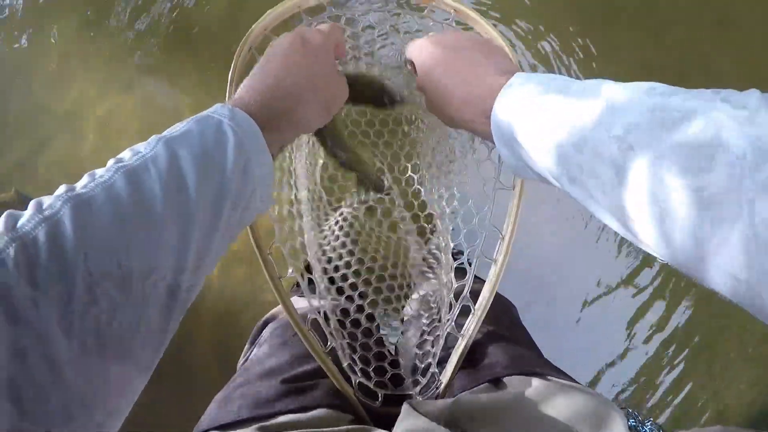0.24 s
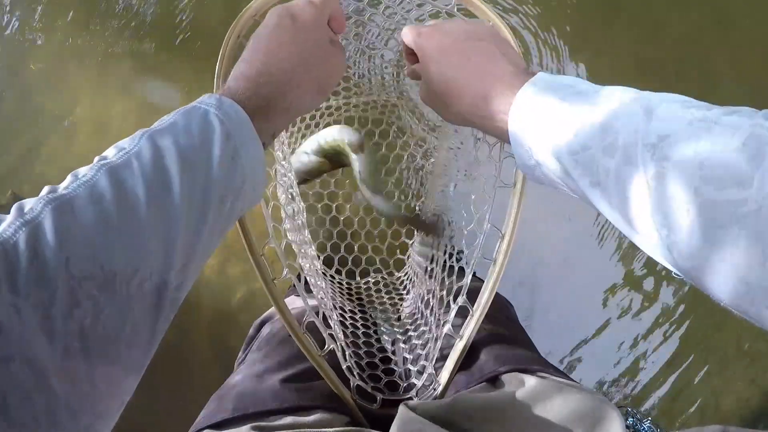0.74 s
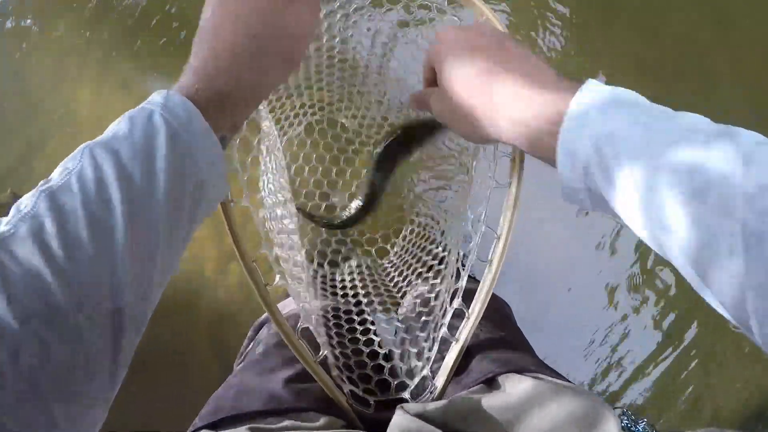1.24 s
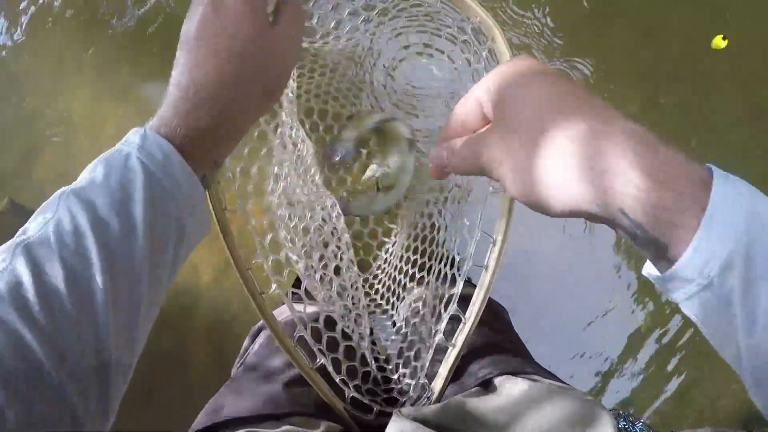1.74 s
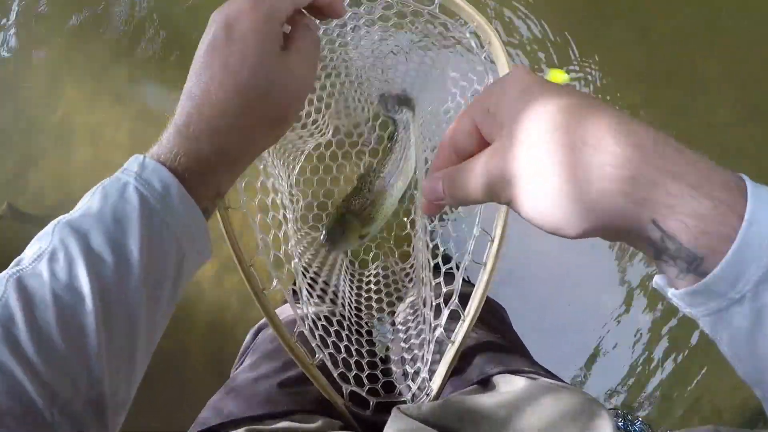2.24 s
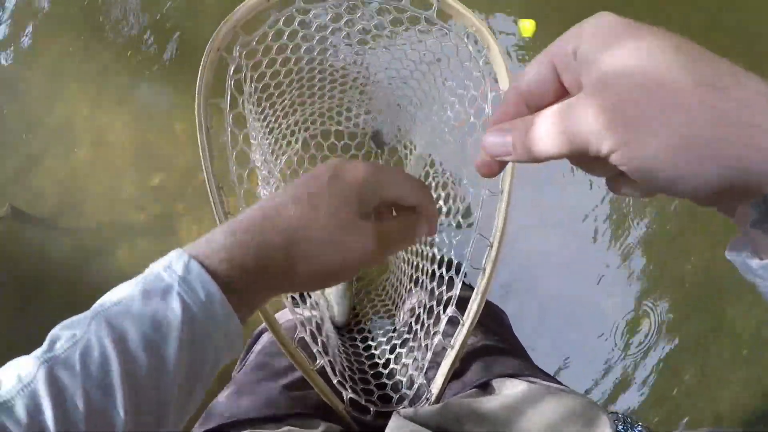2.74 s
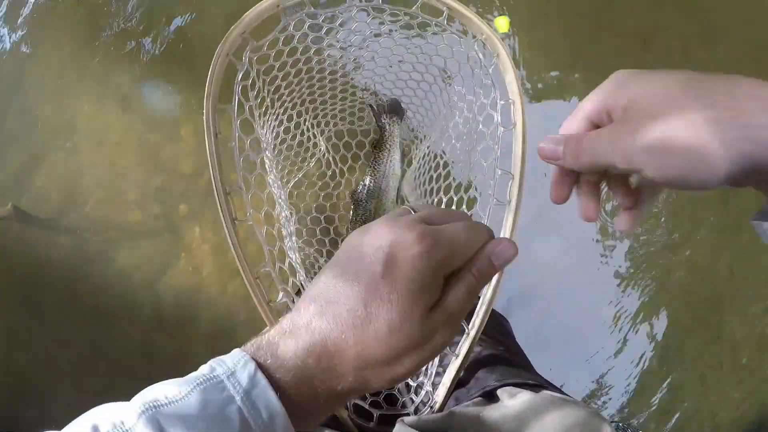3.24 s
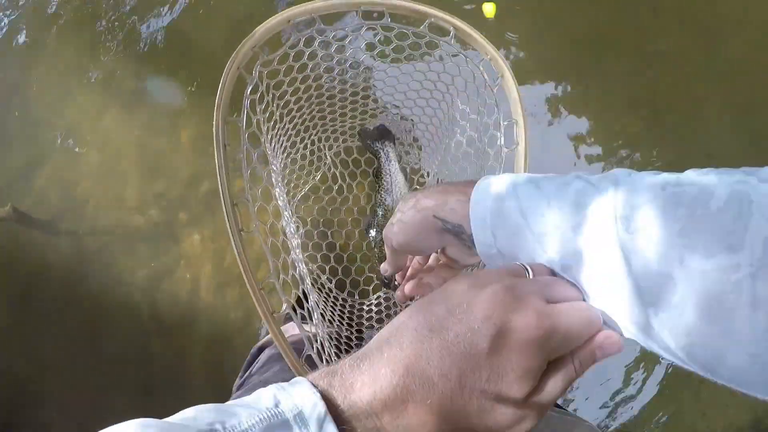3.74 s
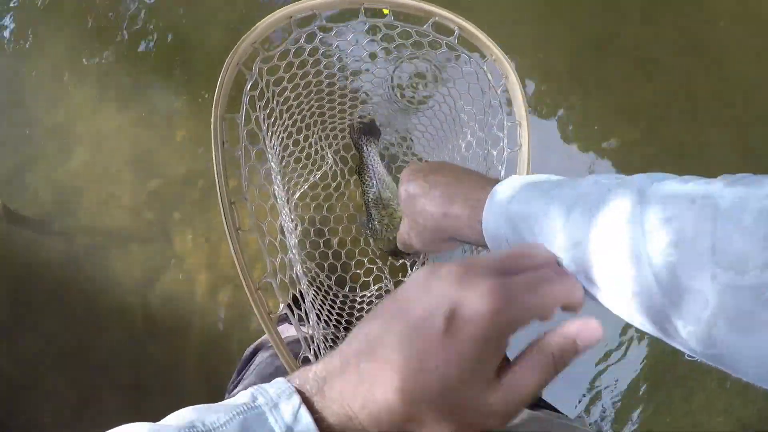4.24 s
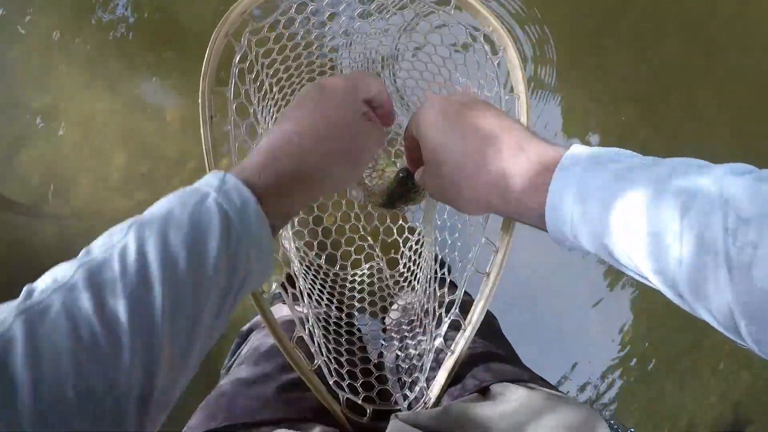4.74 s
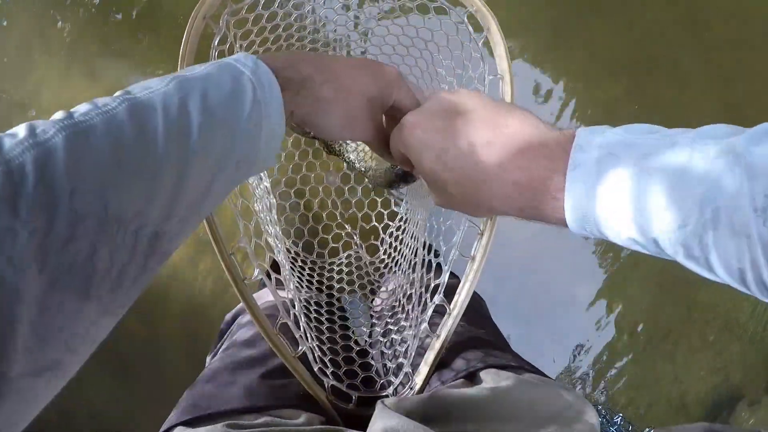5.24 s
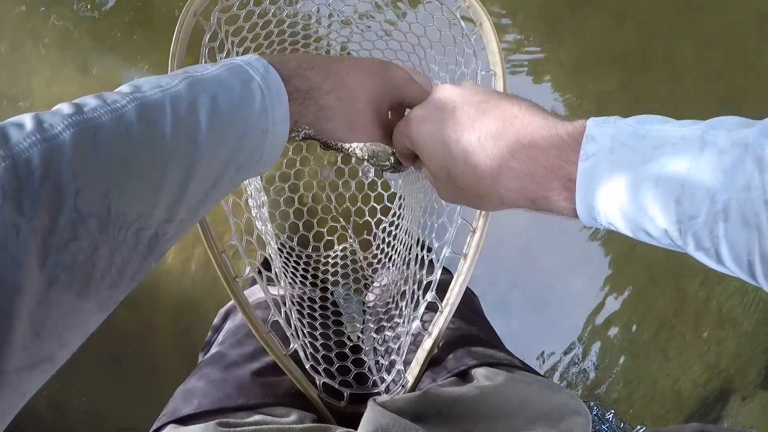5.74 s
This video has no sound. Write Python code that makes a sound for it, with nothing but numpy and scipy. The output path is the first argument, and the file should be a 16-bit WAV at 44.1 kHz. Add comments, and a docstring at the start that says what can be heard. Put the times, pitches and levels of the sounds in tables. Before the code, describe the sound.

Soft low thumps and gritty water flicks from a flapping fish, echoing birdsong over a faint creek, then a loud rumbling wind gust.

```python
"""A creek runs past an angler whose small camera looks down at a fish flapping in a wet landing net.
Filtered noise makes the creek and a fine treble hiss from the start, as short low tones and noise
bursts make the fish's thumps and flicks of water. Thin gliding sines whine high up, now and then.
From 2 s birds whistle in echoing woods, and from 3.2 s one sings a phrase four times, all as gliding sines.
Late on, low puffs and a gust of dull noise buffet the two microphone ports; a last drip falls at 5.1 s."""
import sys
import numpy as np
from scipy import signal
from scipy.fft import rfft, irfft
from scipy.io import wavfile
from scipy.ndimage import uniform_filter1d

SR = 44100
rng = np.random.default_rng(int(sys.argv[2]) if len(sys.argv) > 2 else 0)


def wav_record(signal):
    """Record a signal, one row per channel, as 16-bit PCM in the file named by sys.argv[1]."""
    frames = np.transpose(np.atleast_2d(signal))
    bounded = np.clip(frames, -1, 1)
    # unit amplitude maps onto the largest positive 16-bit level
    quanta = np.round(bounded * 32767).astype(np.int16)
    wavfile.write(sys.argv[1], SR, quanta)


N = 264114
T = np.arange(N) / SR
SHORT_T = np.arange(3000) / SR  # clock for one short event, in seconds
HZ = np.fft.rfftfreq(N, 1 / SR)
SIDES = np.array([[.5], [-.5]])  # half of a left-right difference goes to each side


def undb(db):
    """Decibels to gain."""
    return 10 ** (np.asarray(db) / 20)


def over_hz(table):
    """Straight lines between (f/Hz, value) points on a log axis."""
    hz, value = np.transpose(table)
    return np.interp(np.log(HZ + 1), np.log(hz + 1), value)


def unit(x):
    """Scale to rms 1."""
    return x / np.sqrt(np.mean(x ** 2))


def coloured(x, table):
    """Filter by a (f/Hz, level/dB) spectrum."""
    return irfft(rfft(x) * undb(over_hz(table)), N)


def walk(rate):
    """A smooth random wander: levels held 1 / rate seconds, then averaged twice; spread near 1."""
    k = int(SR / rate)
    steps = np.repeat(rng.standard_normal(N // k + 1), k)
    return 1.19 * uniform_filter1d(uniform_filter1d(steps, k), k)[:N]


def add(out, s, sound, pan_db):
    """Mix a short sound into both channels; the pan leaves their mean gain alone."""
    i = int(s * SR)
    sound, pan = sound[..., :N - i], undb(pan_db * SIDES)
    out[:, i:i + sound.shape[-1]] += sound * pan / pan.mean()


CREEK_DB = -45  # rms of the two-port average above 500 Hz, before the wavering
# tone colour of the water: (f/Hz, level/dB per Hz, relative)
CREEK_COLOUR = [(76, -45), (130, -4.5), (182, 0.5), (246, -9), (319, -8.5), (485, -14.5), (709, -14),
                (1170, -20), (1570, -21), (2170, -26), (3790, -30.5), (6230, -30.5), (12500, -46),
                (14100, -49), (15300, -89)]
# how alike left and right are, before the limits in creek(): (f/Hz, likeness 0-1)
CREEK_LIKENESS = [(60, 0.7), (130, 0.53), (290, 0.85), (640, 0), (1410, 0.09), (3100, 0.53), (6820, 0.5),
                  (15000, 0)]
# which side is louder: (f/Hz, left minus right level/dB)
CREEK_LEAN = [(60, 19), (110, -5), (200, -2.5), (380, -3), (700, -7.5), (1290, -1), (2380, -1), (4400, 1),
              (8120, -1.5), (15000, 0)]
# which side is ahead: (f/Hz, left's lead/radians)
CREEK_LEAD = [(300, -0.41), (600, 2), (950, 1.8), (1460, 1.47), (3270, -1), (6000, 0.75), (7400, 2.5),
              (9000, 1.23)]
# the low roar of the current swells and sinks: (t/s, level/dB)
ROAR_SWELL = [(0, 1.5), (.5, -1.5), (1.2, 1), (2, 0), (3.2, -1), (4, 2.5), (5.2, -0.5), (6, -0.5)]


def creek(swell_db=-0.5, flicker_db=1.0, babble_db=2.04):
    """Octave bands of rushing water, each wavering; the two ports share part of it, one ahead."""
    lead = SIDES * over_hz(CREEK_LEAD)
    # a lead makes the sides look less alike, so more must be shared
    like = np.clip(over_hz(CREEK_LIKENESS) / np.maximum(np.cos(over_hz(CREEK_LEAD)), .5), 0, .95)
    like = np.maximum(like, 0.76 * (HZ > 400) * (HZ < 1300))
    shared, own = rfft(rng.standard_normal(N)), rfft(rng.standard_normal((2, N)))
    water = np.sqrt(like) * shared * np.exp(1j * lead) + np.sqrt(1 - like) * own
    water = water * undb(over_hz(CREEK_COLOUR) + SIDES * over_hz(CREEK_LEAN))
    water = water / np.sqrt(np.mean(irfft(water.mean(0) * (HZ > 500), N) ** 2))
    out, swell = 0, walk(0.97)
    for centre in 170 * 2. ** np.arange(7):
        # neighbouring bands fade into each other
        share = np.cos(np.pi / 2 * np.clip(np.log2((HZ + 1) / centre), -1, 1)) ** 2
        if centre < 200:
            share[HZ < centre] = 1
        if centre < 400:
            db = np.interp(T, *np.transpose(ROAR_SWELL)) + babble_db * walk(14)
        else:
            db = swell_db * swell + flicker_db * walk(12)
        out = out + irfft(water * share, N) * undb(db)
    return out * undb(CREEK_DB)


# a band of fine treble hiss, perhaps far insects: (t/s, level/dB)
HISS_LEVEL = [(0.0, -53.5), (0.25, -57), (1.3, -55.5), (2.0, -54.5), (2.85, -57.5), (3.05, -54.5),
              (3.9, -50), (4.75, -53), (4.95, -58), (5.62, -57.5), (5.99, -60)]
# its tone colour: (f/Hz, level/dB per Hz, relative)
HISS_SPECTRUM = [(3500, -46), (5000, -24), (5800, 2.5), (6700, 0), (7600, -4), (10000, -35)]


def hiss(apart=2.3):
    """Treble noise, mostly separate left and right, with a slowly drawn level and a light flicker."""
    noise = rng.standard_normal(N) + apart * rng.standard_normal((2, N))
    db = np.interp(T, *np.transpose(HISS_LEVEL)) + 0.38 * walk(29.0)
    return unit(coloured(noise, HISS_SPECTRUM)) * undb(db)


# thin whines that wander very high, one table each, before tremble and flicker: (t/s, f/Hz, level/dB)
WHINE_PATHS = [
    [(2.85, 9800, -78), (2.89, 10800, -62), (2.93, 11350, -63), (2.96, 11500, -67), (3.0, 11900, -64),
     (3.05, 12000, -66), (3.1, 11850, -69), (3.21, 11870, -72), (3.28, 12480, -67), (3.33, 12280, -67),
     (3.39, 12700, -67), (3.42, 12050, -68), (3.45, 11850, -69), (3.48, 11150, -62), (3.505, 10100, -71)],
    [(2.99, 8150, -70), (3.04, 8410, -57), (3.08, 8270, -61), (3.24, 8340, -62), (3.28, 8850, -58),
     (3.34, 8620, -57), (3.39, 9100, -59), (3.42, 8450, -56), (3.46, 8100, -66)],
    [(5.25, 9800, -74), (5.29, 10600, -68), (5.33, 11350, -70), (5.37, 11560, -68), (5.42, 11350, -68),
     (5.475, 11800, -65), (5.53, 11200, -68), (5.59, 10980, -66), (5.66, 10800, -66), (5.7, 10600, -68),
     (5.735, 10300, -66), (5.79, 10200, -65), (5.86, 9950, -64), (5.9, 9930, -66), (5.92, 9700, -80)],
    [(5.285, 9600, -76), (5.31, 10050, -65), (5.36, 10480, -64), (5.415, 10300, -66), (5.475, 10500, -67),
     (5.52, 10100, -70), (5.55, 9900, -80)],
    [(0.965, 9600, -74), (0.985, 9800, -62), (1.01, 10070, -65), (1.08, 10100, -67), (1.125, 10280, -65),
     (1.15, 10150, -61), (1.175, 9600, -74)],
]
# where each whine sits: (left minus right level/dB, left's lead/radians)
WHINE_PLACES = [(2, 1.2), (-8, 1.7), (6, .6), (5, -.5), (12, 0.1)]
MIRROR_HZ, MIRROR_DB, MIRROR_FALL_DB_PER_KHZ = 12000, -4, 7  # the twin weakens away from the mirror
WHINE_FLICKER_DB, WHINE_TREMBLE_HZ = 1.6, 35  # typical size of the wander


def whines():
    """Gliding, slightly trembling sines; each has a fainter twin that mirrors its pitch about a fixed frequency."""
    out = np.zeros((2, N))
    for path, (pan_db, lead) in zip(WHINE_PATHS, WHINE_PLACES):
        s, hz, db = np.transpose(path)
        hz = uniform_filter1d(np.interp(T, s, hz), size=400) + WHINE_TREMBLE_HZ * walk(90.)
        db = np.interp(T, s, db, left=-150, right=-150) + WHINE_FLICKER_DB * walk(43.0)
        phase = 2 * np.pi * np.cumsum(hz) / SR + SIDES * lead
        twin_db = MIRROR_DB - MIRROR_FALL_DB_PER_KHZ * np.abs(MIRROR_HZ - hz) / 1000
        twin = undb(twin_db) * np.sin(4 * np.pi * MIRROR_HZ * T - phase)
        add(out, 0, np.sqrt(2) * undb(db) * (np.sin(phase) + twin), pan_db)
    return out


def note(length, start_hz, end_hz, bend, rise_s, fall_s):
    """A sine that glides in pitch, swells in and dies away."""
    t = np.arange(int(length * SR)) / SR
    hz = start_hz + (end_hz - start_hz) * (t / length) ** bend
    edge = np.clip(np.minimum(t / rise_s, (length - t) / fall_s), 0, 1)
    return np.sqrt(2) * np.sin(np.pi / 2 * edge) ** 2 * np.sin(2 * np.pi * np.cumsum(hz) / SR)


def echoed(dry, t60_s, wet_db, late_s):
    """The sound plus a diffuse tail of echoes that starts late_s later and fades 60 dB in t60_s."""
    t = np.arange(SR) / SR
    echoes = rng.standard_normal((2, SR)) * undb(-60 * t / t60_s) * (t > late_s)
    echoes = echoes / np.sqrt(np.sum(echoes ** 2, axis=1, keepdims=True))
    return dry + undb(wet_db) * signal.fftconvolve(dry, echoes, axes=1)[:, :N]


BIRD_PAN_DB = 5  # left minus right
WOODS_T60_S, WOODS_DB = 0.63, -1.5
ONSET_DROP_DB, SWELL_MAX_S, FADE_MAX_S = 7.5, 0.044, 0.12
# whistled and buzzed notes: (start t/s, length/s, start f/Hz, end f/Hz, level/dB, roughness 0-1,
# loudest at share of length, drop by the end/dB)
WHISTLE_NOTES = [(2.0, 0.455, 4825, 4755, -40.5, 0.59, 0.41, 38),
                 (2.48, 0.412, 4705, 4645, -43.5, 0.61, 0.42, 19),
                 (2.91, 0.48, 4590, 4580, -40, 0.6, 0.24, 20),
                 (3.28, 0.66, 4730, 4720, -50.5, 0.85, 0.21, 8),
                 (2.435, 0.17, 5550, 5530, -48, 0.7, 0.3, 10), (2.885, 0.15, 5480, 5440, -46, .7, 0.5, 8),
                 (2.89, .26, 5980, 5960, -53, .97, 0.2, 2), (2.835, .2, 5450, 5650, -49.5, 1, 0.3, 8),
                 (2.435, 0.22, 5900, 5900, -50, .99, 0.26, 8),
                 (3.28, 0.96, 7520, 7450, -55.5, .82, 0.45, 8),
                 (3.87, 0.19, 6525, 6510, -46.5, 0.7, 0.35, -10.5),
                 (3.91, 0.34, 6420, 6410, -42.5, 0.5, 0.14, 5), (3.17, .81, 3260, 3210, -51, .88, 0.078, 2),
                 (4.05, 0.28, 3240, 3230, -52.5, 0.76, 0.36, 0),
                 (3.96, 0.26, 3200, 3480, -50, 0.7, .15, 15)]


def whistles(flutter_s=0.026, swell=0.17, fade=0.52):
    """Gliding notes; rough ones flutter in loudness. Echoes off the trunks smear them."""
    dry = np.zeros((2, N))
    for s, length, start_hz, end_hz, db, rough, top, drop_db in WHISTLE_NOTES:
        rise_s, fall_s = min(swell * length, SWELL_MAX_S), min(fade * length, FADE_MAX_S)
        tone = note(length, start_hz, end_hz, 0.96, rise_s, fall_s)
        progress = np.linspace(0, 1, len(tone))
        arc_db = np.interp(progress, [0, np.clip(top, .05, .95), 1], [-ONSET_DROP_DB, 0, -drop_db])
        share = np.clip(rough, 0, 1)
        # rough notes flutter faster, which widens their line
        flutter = uniform_filter1d(rng.standard_normal(SR), int(flutter_s * SR * (1.08 - share)))
        wobble = np.sqrt(1 - share ** 2) + share * unit(flutter)[:len(tone)]
        add(dry, s, undb(db) * tone * undb(arc_db) * wobble, BIRD_PAN_DB)
    return echoed(dry, WOODS_T60_S, WOODS_DB, late_s=0.03)


PHRASE_T60_S, PHRASE_ECHO_DB = 0.95, 0
HIGH_NOTE_HZ, DIP_HZ, SLUR_HZ = 3100, 2500, 2000  # limits that pick out the notes with extra gain
# the seven notes of the warbler's phrase:
# (delay/s, length/s, start f/Hz, end f/Hz, bend, level/dB before the round's gains)
PHRASE_NOTES = [(-.033, 0.026, 3485, 3750, 1.2, -45), (-.003, 0.028, 2935, 2804, 0.63, -44.5),
                (0.049, 0.015, 3280, 3400, 1.1, -42), (0.061, 0.015, 2750, 2260, 0.96, -45.5),
                (0.065, 0.031, 2298, 2160, .5, -43), (0.132, 0.0338, 2220, 2780, 1.08, -44.5),
                (0.207, .08, 1597, 2115, 2.4, -53.5)]
# each round of the phrase: (t/s, gain/dB, extra gain/dB of the high notes, of the note at the bottom
# of the dip, of the low closing slur)
PHRASE_ROUNDS = [(3.242, -2.5, -4, -5, 0), (3.621, -1, -16, -0.5, -2), (4.004, 0, -7, -0.5, 1),
                 (4.392, 0.7, -1, -1.5, 0.5)]


def warbler():
    """A phrase of seven quick gliding notes, sung four times, with echoes off the trunks."""
    song = np.zeros((2, N))
    for s, round_db, high_db, dip_db, slur_db in PHRASE_ROUNDS:
        for delay, length, start_hz, end_hz, bend, db in PHRASE_NOTES:
            db = db + round_db + high_db * (start_hz > HIGH_NOTE_HZ)
            db = db + dip_db * (end_hz < start_hz < DIP_HZ) + slur_db * (start_hz < SLUR_HZ)
            tone = note(length, start_hz, end_hz, bend, 0.005, 0.0062)
            add(song, s + delay, undb(db) * tone, BIRD_PAN_DB)
    return echoed(song, PHRASE_T60_S, PHRASE_ECHO_DB, late_s=0.012)


WIND_WANDER_DB = 2


def wind(table, colour, pan_db, burst_db, rate, likeness, calm_likeness, evenness, calm_db=-33.0):
    """Turbulence at each port: dull noise with small bursts; left-right likeness differs when it is calm."""
    db = np.interp(T, *np.transpose(table), left=-120)
    noise = coloured(rng.standard_normal((2, N)), colour)
    # eddies follow each other closely, so the level is steadier than that of free noise
    noise = noise / uniform_filter1d(noise ** 2, size=1500, axis=1) ** (np.clip(evenness, 0, 1) / 2)
    left, right = (unit(port * undb(burst_db * walk(rate))) for port in noise)
    like = likeness + (calm_likeness - likeness) / (1 + undb(2 * (db - calm_db)))
    ports = np.array([left + like * right, right + like * left]) / (1 + like)
    # the stronger side wanders as the eddies swing round
    pan = undb(SIDES * (pan_db + WIND_WANDER_DB * walk(12.)))
    return ports * undb(db) * pan / np.sqrt(np.mean(pan ** 2, axis=0))


# a very low rumble at the ports: (t/s, level/dB)
DEEP_LEVEL = [(0.0, -41), (0.2, -58), (0.43, -54.5), (1.5, -61), (2.6, -66), (3.6, -67), (3.99, -57),
              (4.19, -43), (4.27, -27), (4.4, -20), (4.74, -20.5), (4.89, -17.5), (4.97, -26), (5.3, -33),
              (5.5, -31.5), (5.96, -35.5)]
# its tone colour: (f/Hz, level/dB per Hz, relative)
DEEP_SPECTRUM = [(10, -23), (22, 0), (60, -2), (100, -1.5), (135, -7), (200, -48), (500, -130)]


def deep_rumble():
    """Very low rumble: noise below 200 Hz, the same at both ports when quiet."""
    return wind(DEEP_LEVEL, DEEP_SPECTRUM, pan_db=-2, burst_db=1.5, rate=20.0,
                likeness=.02, calm_likeness=1.0, evenness=0.5)


# the gust over the port openings: (t/s, level/dB)
GUST_LEVEL = [(4.14, -40), (4.2, -28), (4.3, -24.5), (4.4, -16.5), (4.47, -21), (4.54, -20.5), (4.64, -24),
              (4.74, -22.5), (4.8, -29), (4.95, -28.5), (5.04, -50), (5.24, -47), (5.99, -58)]
# its tone colour: (f/Hz, level/dB per Hz, relative)
GUST_SPECTRUM = [(65, -40), (110, -2.5), (177, -2), (263, -10), (295, -12), (339, -15), (531, -27),
                 (900, -44), (1170, -86), (1980, -120)]


def gust():
    """Rough air over the openings: bursting low noise, partly opposite left and right when strong."""
    return wind(GUST_LEVEL, GUST_SPECTRUM, pan_db=-6, burst_db=4.5, rate=55.0,
                likeness=-0.46, calm_likeness=.05, evenness=0.12)


PUFF_S, EDGE_S, EDGE_RATIO, EDGE_DB = 0.0069, 0.0024, 1.804, 3.5
# lone puffs of air in and around the gust: (t/s, peak level/dB before the edge, f/Hz, left minus right level/dB)
PUFF_LIST = [(3.765, -23.5, 174, -26), (3.878, -23, 171, -28), (3.929, -26.5, 170, -25),
             (3.962, -17.5, 215, -35), (4.016, -19, 187, -34), (4.043, -18, 228, -35),
             (4.079, -21, 167, -27), (4.205, -25, 197, -20), (4.239, -16, 195, -24), (4.269, -15, 174, -14),
             (4.298, -17, 164, -15), (4.327, -16.5, 198, -15), (4.348, -14, 181, -11),
             (4.385, -13, 179, -3), (4.407, -10.5, 188, -6), (4.434, -15.5, 280, 6), (4.455, -11, 164, -3),
             (4.485, -10.5, 170, 0), (4.515, -9, 169, 0), (4.535, -13.5, 202, -1), (4.559, -13.5, 160, -7),
             (4.598, -12.5, 180, -29), (4.625, -17, 169, -12), (4.663, -15, 174, -8),
             (4.707, -12.5, 149, -17), (4.728, -14, 205, -8), (4.745, -15, 228, -15),
             (4.824, -14, 158, -31), (4.871, -16, 111, -12), (4.902, -14, 120, -8),
             (5.071, -17.5, 172, -29), (5.157, -23, 159, -29)]


def puffs():
    """Each puff rocks the port cavity for a few cycles, with a short bright edge that grows with its strength."""
    out, t = np.zeros((2, N)), SHORT_T
    shape = np.exp(-((t - 1.1 * PUFF_S) / PUFF_S) ** 2)
    edge = undb(EDGE_DB) * np.exp(-((t - PUFF_S) / EDGE_S) ** 2)
    for s, db, hz, pan_db in PUFF_LIST:
        rock = shape * np.sin(2 * np.pi * hz * t)
        bright = undb(db) * edge * np.sin(2 * np.pi * EDGE_RATIO * hz * t)
        add(out, s - .004, undb(db) * (rock + bright), pan_db)
    return out


# lone drips: (t/s, starting f/Hz, level/dB before the fade and pan)
DRIP_LIST = [(0.207, 1250, -37), (1.203, 775, -34), (1.372, 1100, -41), (2.09, 1370, -48),
             (5.074, 1330, -38)]


def drips(drip_s=0.011):
    """Each drip is a short ringing bubble."""
    out, t = np.zeros((2, N)), SHORT_T
    for s, hz, db in DRIP_LIST:
        # the bubble rises in pitch as it nears the surface
        ring = np.exp(-t / drip_s) * np.sin(2 * np.pi * hz * t * (1 + 1.6 * t))
        add(out, s, undb(db) * ring, -3.0)
    return out


FLICK_PAN_DB, SLAP_PAN_DB = 0.5, 1
TICK_DB, TICK_MS = 3.5, 0.51
# while the fish thrashes, small stray flicks fall at random around these values
STRAYS, THRASH_END_S, STRAY_DB, STRAY_HZ = 16, 2, -34, 5100
STRAY_SLAP_DB, STRAY_SPREAD_MS = -1, 1.5
# water flicked off the mesh:
# (t/s, level/dB before colouring, centre f/Hz, slap above the spray/dB before colouring, spread/ms)
FLICK_LIST = [(0.014, -28.5, 4400, 4, 1.9), (0.1476, -32, 4110, 5, 5.3), (0.1998, -34.5, 6000, 11, 5),
              (0.421, -33.5, 6500, -3, 1.5), (0.6465, -32, 5910, 4, 1.9), (0.6709, -31.5, 6380, 4, 3.3),
              (0.7017, -36, 5910, -6, 2.7), (0.7383, -30, 5740, -10, 2.6), (0.8558, -26.5, 5470, -6, 7.4),
              (0.8922, -23.5, 5800, 0, 5.2), (1.0855, -33, 6200, 4, 7.9), (1.2, -31, 3410, 9.5, 5),
              (1.22, -32, 4000, 6, 11), (1.2402, -29, 4610, 0, 3.2), (1.323, -27, 3220, 7, 1.7),
              (1.338, -29.5, 2500, -2, 3), (1.371, -30.5, 4930, 10.5, 2.8), (1.5138, -35.5, 5890, -1, 2.8),
              (1.66, -35.5, 5700, -4, 11), (1.757, -28.5, 3500, -1, 8.7), (1.7733, -28.5, 6140, -5, 5.6),
              (1.9334, -29, 3870, 3, 3), (1.954, -22, 4030, -10, 4.4), (1.973, -27.5, 5690, 6, 3.8),
              (2.0744, -27, 4900, 5, 8.1), (2.089, -29.5, 4900, 9, 9), (2.174, -27, 4000, 5.5, 2.2),
              (2.375, -29.5, 6270, 2, 5), (2.6302, -23, 6000, -10, 2)]
# tone colour of the spray: (f/Hz, level/dB per Hz)
SPRAY_SPECTRUM = [(500, -40), (1500, -32), (3000, -11), (6000, -6.5), (9000, -19.5), (14000, -34),
                  (17000, -35)]
# tone colour of the wet slap: (f/Hz, level/dB per Hz)
SLAP_SPECTRUM = [(200, -36), (450, -2), (900, -13.5), (1500, -10.5), (2500, -15), (5000, -46)]


def flicks(spray=0.68):
    """Water leaves the mesh in short gritty bursts: a tick, a spray ringing at its centre and a wet slap."""
    burst, slap = np.zeros((2, 2, N))
    t, ms = SHORT_T, SHORT_T * 1000
    strays = [(0.0069 + THRASH_END_S * a, STRAY_DB + 3 * (b - .5), STRAY_HZ * 2 ** (c - .5),
               STRAY_SLAP_DB, STRAY_SPREAD_MS) for a, b, c in rng.random((STRAYS, 3))]
    # a sharp tick leads the spray
    tick = undb(TICK_DB) * (t >= .005) * np.exp(-np.abs(ms - 5) / TICK_MS)
    for s, db, hz, slap_db, spread_ms in FLICK_LIST + strays:
        shape = tick + np.exp(-((ms - 5 - 1.04 * spread_ms) / spread_ms) ** 2)
        noise = rng.standard_normal(len(t)) + 0.42 * rng.standard_normal((2, len(t)))
        ring = signal.lfilter(*signal.iirpeak(min(hz, 9000.), 2.2, fs=SR), noise)
        add(burst, s - .005, undb(db) * shape * (ring + spray * noise), FLICK_PAN_DB)
        add(slap, s - .005, undb(db + slap_db) * shape * noise, SLAP_PAN_DB)
    return coloured(burst, SPRAY_SPECTRUM) + coloured(slap, SLAP_SPECTRUM)


THUMP_OVERTONE, OVERTONE_DB = 1.8, -7  # times the pitch; level against the main tone
# the fish thumps the net: (t/s, level/dB before shaping, starting f/Hz, left minus right level/dB)
THUMP_LIST = [(0.16, -27.5, 340, -6), (0.194, -26, 191, -1.5), (0.402, -13.5, 175, -21),
              (0.414, -16, 164, -19), (0.645, -17, 177, -19), (0.658, -19, 172, -7), (0.706, -26, 183, -1),
              (0.861, -21, 165, -2), (0.889, -19, 193, 1), (1.2, -22.5, 181, -12), (1.229, -30, 450, -8),
              (1.345, -15.5, 177, -2), (1.357, -34, 193, -3), (1.364, -18, 203, -1),
              (1.923, -17.5, 242, -1), (1.935, -21.5, 235, -3), (1.953, -18, 210, 0), (2.081, -21, 240, -2),
              (2.174, -19, 200, -3), (2.601, -25.5, 181, 1)]


def thumps(thump_s=0.0074):
    """Each thump of the fish is a few low cycles that sink in pitch, with one overtone."""
    out, t = np.zeros((2, N)), SHORT_T
    shape = (1 - np.exp(-t / 0.0025)) * np.exp(-(t / thump_s) ** 1.7)
    for s, db, hz, pan_db in THUMP_LIST:
        phase = 2 * np.pi * hz * t * (1 - 4 * t)
        body = np.sin(phase) + undb(OVERTONE_DB) * np.sin(THUMP_OVERTONE * phase)
        add(out, s, undb(db) * shape * body, pan_db)
    return out


LOW_CUT_HZ, TOP_HZ, CEILING = 108.7, 15400, 1


def scene():
    """Water, birds, wind and fish; the camera's low cut spares only the deep rumble."""
    background = creek() + hiss() + whines() + whistles() + warbler()
    air = gust() + puffs()
    fish = drips() + flicks() + thumps()
    low_cut = signal.cheby2(8, 45, LOW_CUT_HZ, "high", fs=SR, output="sos")
    return signal.sosfilt(low_cut, background + air + fish) + deep_rumble()


def record(dry):
    """The camera rounds the loudest peaks and cuts the top."""
    rounded = CEILING * np.tanh(dry / CEILING)
    top_cut = signal.ellip(10, .2, 80, TOP_HZ, fs=SR, output="sos")
    return signal.sosfilt(top_cut, rounded)


dry = scene()
out = record(dry)
wav_record(out)
```